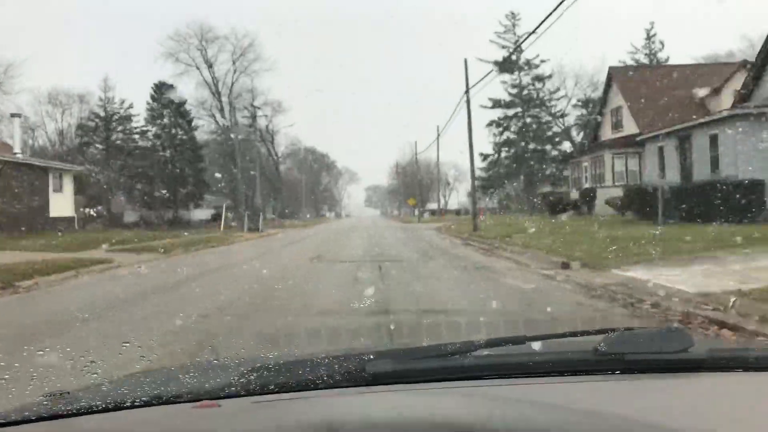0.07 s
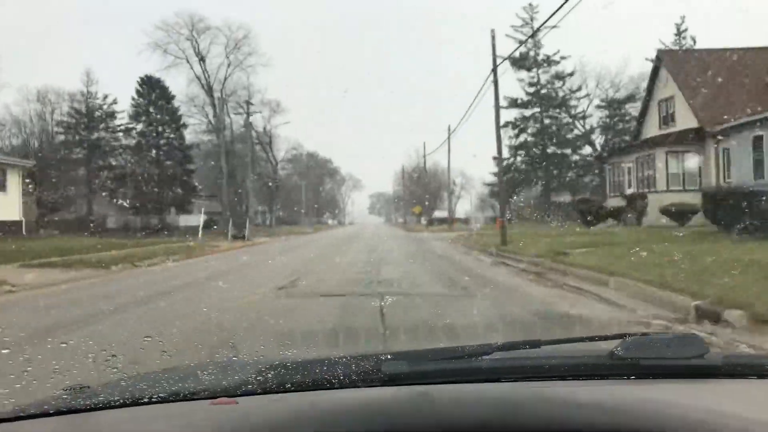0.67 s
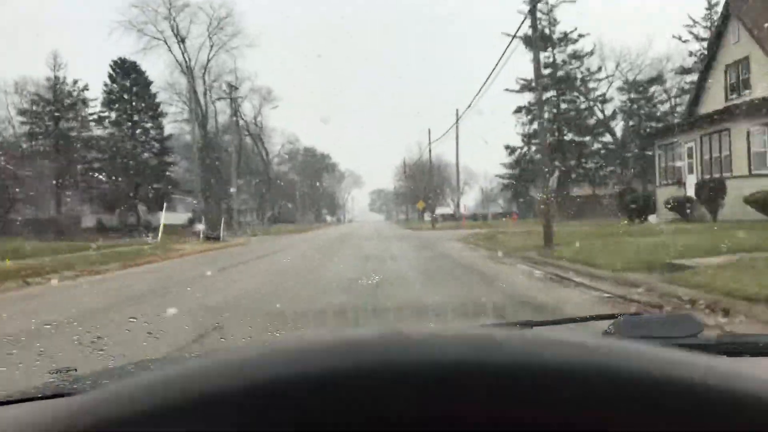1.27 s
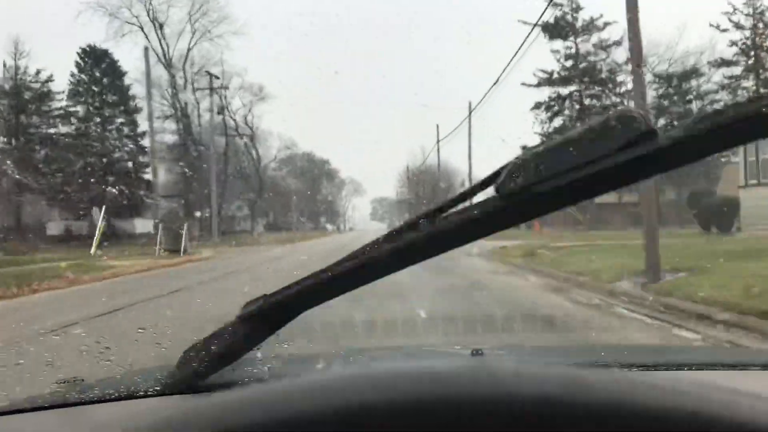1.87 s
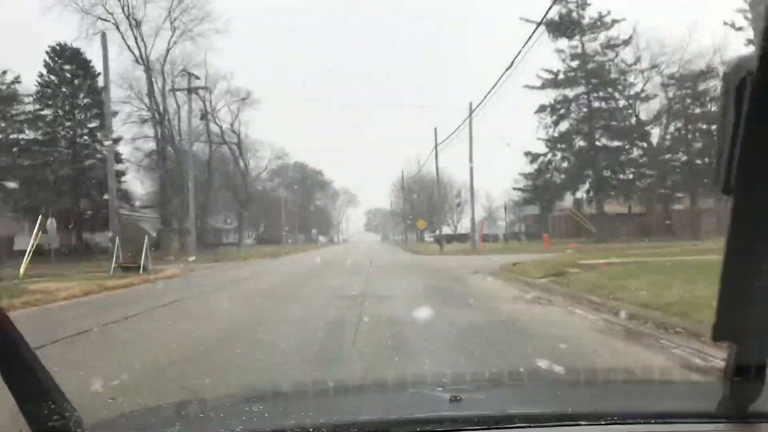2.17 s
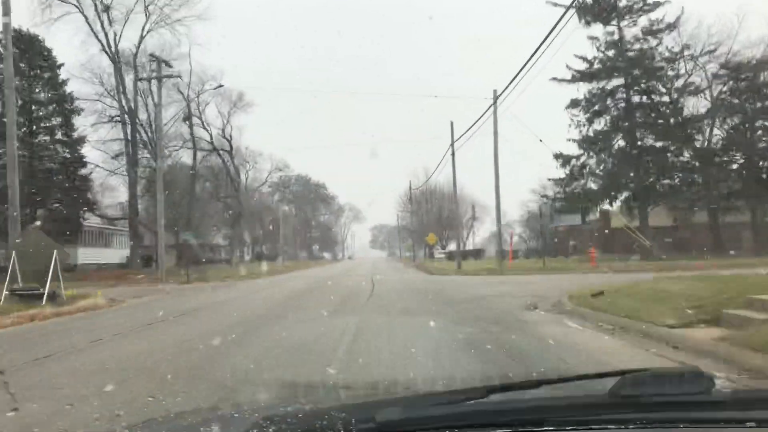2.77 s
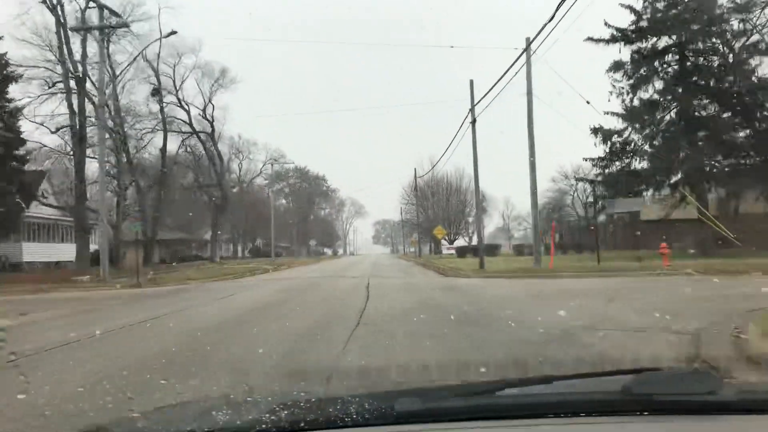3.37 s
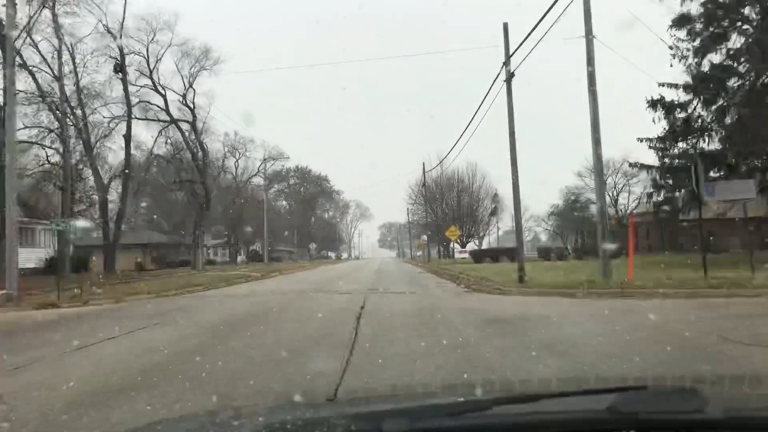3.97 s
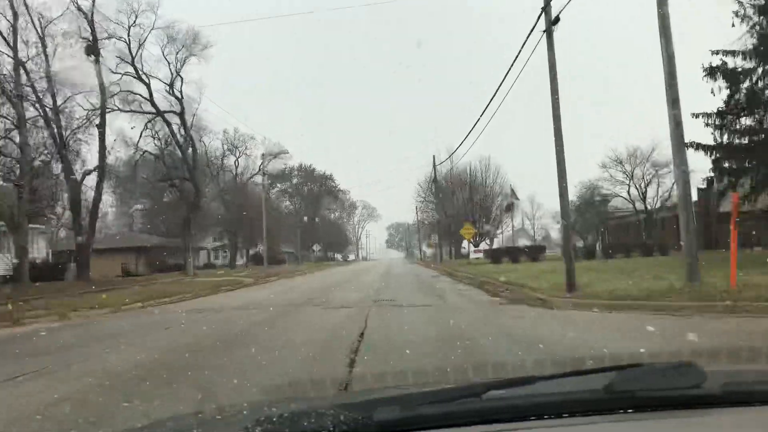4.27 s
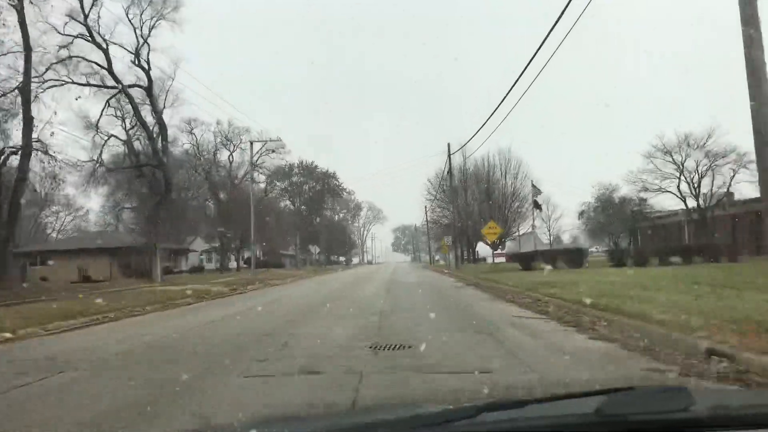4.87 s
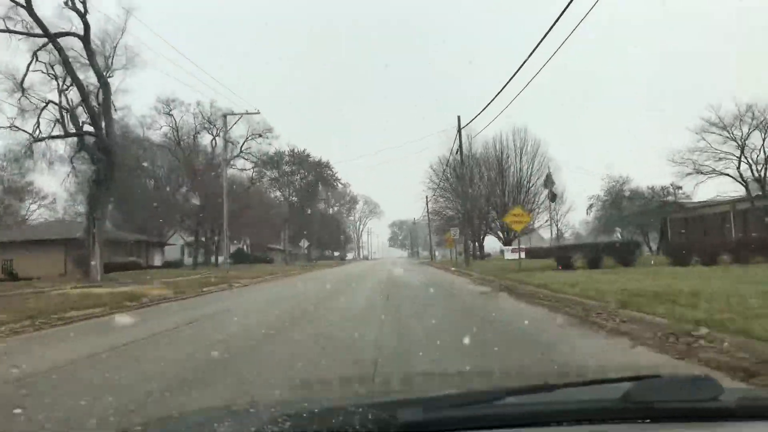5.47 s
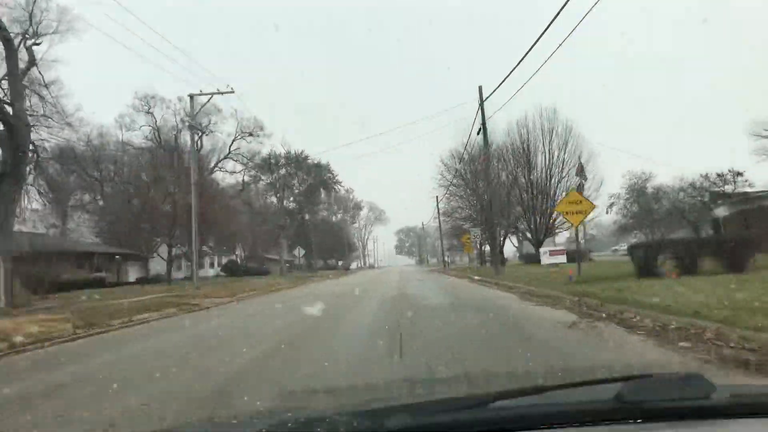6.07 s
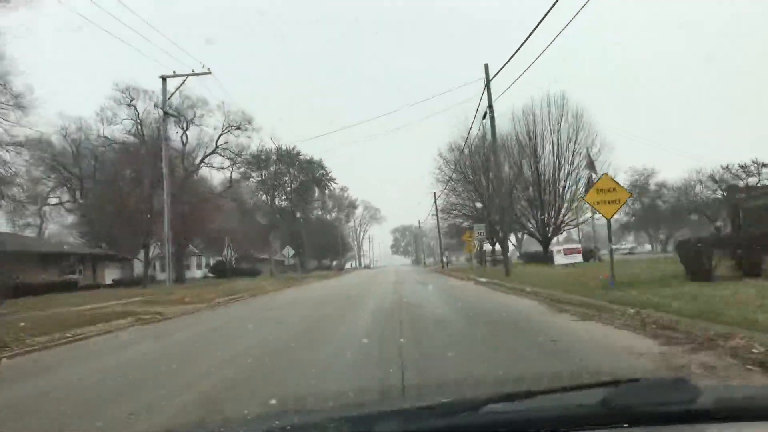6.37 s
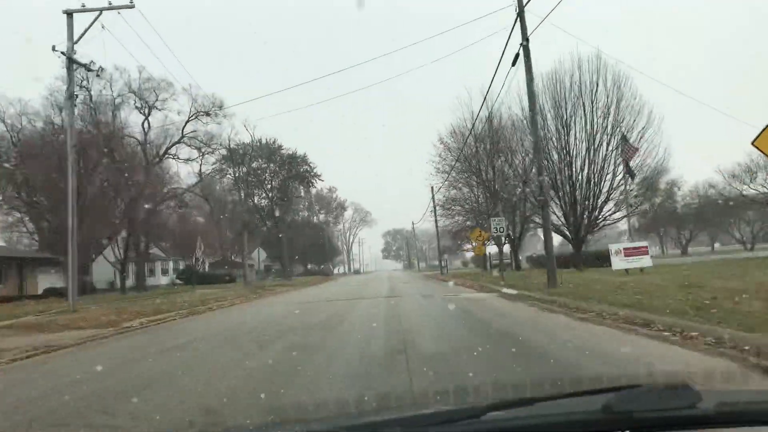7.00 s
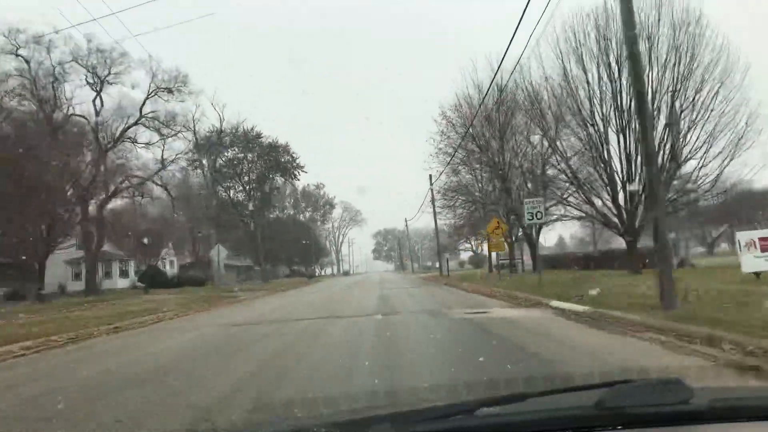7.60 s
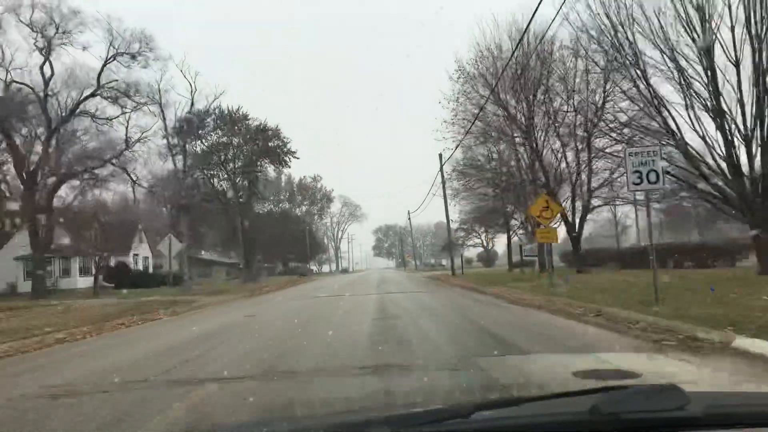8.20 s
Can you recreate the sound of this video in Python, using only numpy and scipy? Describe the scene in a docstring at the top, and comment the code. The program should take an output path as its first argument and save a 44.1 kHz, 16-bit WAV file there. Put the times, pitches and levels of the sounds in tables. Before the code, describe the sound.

Tyres boom and roar on worn asphalt for about eight seconds, heard from behind the steering wheel. A low engine hum, soft heater hiss, faint gear whine and lightly ticking trim run throughout. Near 0.8 seconds the car thumps over cracks, with a small plastic click. At about 1.6 seconds a stalk clicks sharply and the wipers make one sweep, the linkage knocking dully and the blades hissing briefly on wet glass, ending with knocks at 2.3 seconds. More road thumps overlap this, and the engine drops in pitch around 2 seconds as it shifts up. From 2.4 to 3.5 seconds the tread sings on a ribbed patch, with a tiny metallic tink near 2.9. The rumble swells with further thumps around 4.2, 5.4 to 5.9 and 7.2 to 7.4 seconds, the trim knocking near 5.5. The engine pitch rises slowly through the second half.

```python
"""Tyres on a worn, damp street, heard from inside the car: coarse asphalt booms and roars through the body,
cracks thump, and ribbed patches make the tread sing. The engine hums through the bulkhead and shifts up.
A stalk clicks and the wipers make one sweep, linkage knocking, blades hissing on wet glass.
Behind it all the heater blows, the trim ticks and the gears whine faintly with the road speed."""
import sys
import numpy as np
from scipy import signal
from scipy.fft import rfft, irfft, next_fast_len
from scipy.io import wavfile

SR = 44100
rng = np.random.default_rng(int(sys.argv[2]) if len(sys.argv) > 2 else 0)


def log_audio(samples):
    """Write samples as a 16-bit WAV file to the path given in sys.argv[1]."""
    # one column per channel
    frames = np.atleast_2d(samples).T
    # limit to full scale, then quantise
    limited = np.clip(frames, -1, 1)
    pcm = np.round(limited * 32767).astype(np.int16)
    wavfile.write(sys.argv[1], SR, pcm)


N = 363384
T = np.arange(N) / SR
HEAVE_DB, BOOM_DB, ROAR_DB = -44, -24, -35  # road noise on smooth asphalt

# The tone of struck plastic. Each row: frequency in Hz, level in dB.
PLASTIC_TONE = [(400, 3), (1400, 5.5), (2000, 2), (2400, 12.5), (2950, 1), (3550, 9), (4400, -0.5),
                (5200, 6.5), (5800, -1.5), (6300, 7.5), (6900, -1), (8300, 1.5), (9000, 1.5), (11000, -5),
                (13500, -1), (16000, -4.5)]


def tyres(heave_gain, boom_gain, roar_gain, rush_db=-46, rush_db_per_s=0.29):
    """Ruts heave the body, coarse asphalt shakes it into a boom and a roar; the tread sings and rushes."""
    # The tone of each layer. Each row: frequency in Hz, relative level in dB.
    heave_tone = [(24, -38), (31, -19), (38, -0.5), (48, -2.5), (61, -4), (80, -22.5)]  # the body on its suspension
    boom_tone = [(18, -44.5), (26, -29.5), (35, -6), (49, -1), (66, -3.5), (87, 5), (115, -2), (155, -7),
                 (190, -13), (260, -30.5)]
    roar_tone = [(130, -3.5), (195, -0.5), (280, 0), (322, -3.5), (355, -2), (420, -8), (500, -11.5),
                 (620, -13.5), (760, -21), (1100, -43)]
    sing_tone = [(220, -6), (262, -4), (287, 5.5), (320, -6), (356, 4), (378, -14), (398, 0), (450, -11.5),
                 (570, -15.5), (700, -24)]
    rush_tone = [(550, -28), (760, -3), (870, 4.5), (1050, 5), (1290, 0), (1440, 4.5), (1580, 2.5),
                 (1800, -5.5), (2300, -3), (2700, -21), (4500, -21)]
    # Ribbed patches that make the tyres sing. Each row: start, attack, hold, release in seconds,
    # level in dB.
    ribs = [(2.4, 0.11, 0.5, 0.56, -39.5), (2.78, 0.076, 0.04, 0.21, -38)]
    boom = colour(grit(per_s=1500, spread_db=0.5), boom_tone, tilt_db=0.84) * boom_gain
    roar = colour(noise(), roar_tone) * roar_gain
    sing = colour(noise(), sing_tone) * swells(ribs)
    creep_db = rush_db_per_s * (T - T.mean())
    rush = colour(noise(), rush_tone) * undb(rush_db + creep_db + 0.5 * drift(hz=22))
    heave = colour(noise(), heave_tone) * heave_gain
    return heave + boom + roar + sing + rush


def road_surface():
    """Gains of heave, boom and roar: each worn stretch adds its power to that of the smooth asphalt."""
    # Worn stretches. Each row: start and length in seconds, then heave, boom and roar in dB.
    stretches = [(0.77, 0.07, -22, -21, -48), (1.012, 0.016, -21, -17.5, -52),
                 (1.574, 0.52, -25.5, -21.5, -41), (2.144, 0.41, -27, -27.5, -58),
                 (3.15, 0.24, -27, -25, -38), (3.72, 0.035, -30, -43, -36.5), (4.122, 0.39, -26, -27, -47),
                 (4.725, 0.35, -33, -22.5, -40), (5.42, 0.3, -23, -21.5, -47),
                 (6.143, 0.33, -27.5, -35, -41.5), (7.145, 0.39, -26, -29, -54)]
    power = undb([HEAVE_DB, BOOM_DB, ROAR_DB])[:, None] ** 2
    for start, length, *levels_db in stretches:
        envelope = swell(start, attack_s=0.0039, hold_s=length, release_s=0.25)
        power = power + np.outer(undb(levels_db), envelope) ** 2
    return np.sqrt(power)


def crack_thumps(gain_db=-2.5):
    """A tyre folds over a crack: the cabin air swells for one cycle and is damped within two more."""
    # Cracks in the road. Each row: start in seconds, relative level in dB, pitch in Hz.
    cracks = [(0.733, -7, 120), (0.777, -4.5, 111), (0.847, -0.5, 117), (1.031, -6, 94), (1.222, -10, 100),
              (1.623, -1.5, 115), (1.719, 0.5, 127.5), (1.797, -4, 59.6), (1.959, -5, 81.4),
              (1.989, -4, 83.6), (3.410, -8, 121), (3.736, -13, 72), (3.913, -9, 97), (4.137, -1, 109),
              (4.204, -12, 105), (4.289, -4, 79.4), (4.91, -10.5, 100), (5.439, -2, 111),
              (5.505, -2.5, 121), (5.765, -3, 90), (5.865, -3, 80.5), (7.170, -7.5, 101), (7.241, -9, 109),
              (7.309, -10.5, 101), (7.426, -9.5, 101.4)]
    out, t = np.zeros(N), T[:SR // 8]
    for start, db, hz in cracks:
        cycles = hz * t
        envelope = (cycles * np.exp(1 - cycles)) ** 3
        add(out, start, -undb(db + gain_db) * envelope * np.sin(2 * np.pi * cycles))
    return out


def engine(wander=0.0028):
    """Only the lowest firing orders pass the bulkhead: a hum that wavers a little in pitch."""
    # Revs and load through the upshift. Each row: time in seconds, firing rate in Hz, level in dB.
    revs = [(0, 68.78, -23), (.8, 73.25, -30), (1.9, 75, -27.5), (2.3, 51.5, -42), (4.2, 48.06, -24),
            (5.1, 50.3, -31), (7.2, 56.75, -34.5), (7.8, 58.55, -28.5), (8.24, 59.6, -26.5)]
    orders_db = [1, -5, -44, -37.5, -24]
    firing_hz, level_db = curves(revs)
    phase = 2 * np.pi * np.cumsum(firing_hz * (1 + wander * drift(hz=4.2))) / SR
    hum = sum(undb(db) * np.sin(order * phase) for order, db in enumerate(orders_db, 1))
    return unit(hum) * undb(level_db)


def plastic_clicks():
    """The stalk and small plastic parts snap sharply and ring briefly."""
    # Each row: start in seconds, level in dB, ring time in seconds, brightness in dB per octave.
    clicks = [(.744, -54, .05, 7), (.8603, -42.5, .016, 2), (.8628, -40.5, .013, 3),
              (0.868, -42, .035, -10), (1.083, -45, 0.04, -5.5), (1.088, -47, .025, -4),
              (1.553, -44, 0.079, 0), (1.5614, -35.5, .035, -2), (1.5695, -30.5, .045, -2),
              (1.5743, -35, 0.049, -1.5), (1.5897, -35, .035, -5), (1.593, -35, 0.088, -5),
              (1.604, -45, .06, -3), (2.2815, -39, .014, -5), (2.3063, -36, .04, -7.5),
              (2.320, -40, 0.057, -8.5), (4.672, -58, .03, 5), (5.401, -40, .035, -5.5)]
    out = np.zeros(N)
    for start, db, t60, tilt_db in clicks:
        add(out, start, undb(db) * strike(PLASTIC_TONE, t60, tilt_db))
    return out


def dull_knocks(gain_db=4):
    """The wiper linkage and the trim knock with a soft attack and a low, damped ring."""
    # Each row: start in seconds, relative level in dB, ring time in seconds, brightness in dB per octave.
    knocks = [(.859, -34, .07, 4), (1.620, -35, .12, -.5), (1.720, -33, .08, -.5), (1.848, -33.5, .06, 3),
              (1.865, -36.5, .05, 2.5), (1.877, -36, .05, 3), (1.985, -38, .05, 2), (2.032, -43, .06, 2.5),
              (2.305, -35.5, .08, .5), (2.317, -30, .08, -2.5), (2.338, -33.5, .08, .5),
              (5.440, -39, .08, 1.5), (5.566, -34, .04, 2), (5.574, -33, .07, 2)]
    # The tone of the knocked parts. Each row: frequency in Hz, level in dB.
    knock_tone = [(150, -3), (350, 26.5), (540, 16), (750, 4), (1200, 12), (2000, 0), (3500, -9),
                  (7000, -34), (16000, -48)]
    out = np.zeros(N)
    for start, db, t60, tilt_db in knocks:
        add(out, start, undb(db + gain_db) * strike(knock_tone, t60, tilt_db, attack_s=0.002))
    return out


def metal_tinks():
    """A small metal part is tapped: a click of contact and a few high, short modes."""
    # Each row: start in seconds, level in dB, relative contact level in dB, brightness in dB per octave.
    taps = [(1.329, -45, -6, -6), (2.878, -38.5, -10, 1)]
    # The part's modes. Each row: frequency in Hz, relative level in dB, ring time in seconds.
    metal_modes = [(4800, -8, 0.033), (5130, -9, .025), (5650, -17, .02), (9000, -13, .03),
                   (9080, -9, .035), (9630, -11, .03), (13300, -22, .02)]
    out, t = np.zeros(N), T[:SR // 3]
    hz, modes_db, t60 = np.transpose(metal_modes)
    modes = np.sin(2 * np.pi * np.outer(hz, t)) * np.exp(-np.log(1000) * np.outer(1 / t60, t))
    for start, db, contact_db, tilt_db in taps:
        ring = undb(modes_db + tilt_db * np.log2(hz / hz.mean())) @ modes
        contact = undb(contact_db) * strike(PLASTIC_TONE, t60=0.038, tilt_db=-2)
        add(out, start, undb(db) * (ring + contact))
    return out


def sliding_hiss():
    """Sliding contact, such as blades on wet glass, catches and slips in tiny grains: a fine hiss."""
    # Light slides. Each row: start, attack, hold, release in seconds, level in dB.
    slides = [(.856, .012, 0.042, 0.074, -54.5), (1.02, 0.067, .27, .1, -68),
              (1.86, 0.12, .004, 0.051, -52)]
    # The tone of the friction. Each row: frequency in Hz, level in dB.
    hiss_tone = [(1500, 12), (4000, -4), (7000, -3), (10000, -2), (14000, -1), (16000, 0)]
    return colour(grit(per_s=2400, spread_db=2), hiss_tone) * swells(slides)


def heater(air_db=-49, flutter_db=0.57, waver_db=2):
    """Air hisses evenly from the windscreen vents, with faint, wavering tones of the fan."""
    # The tone of the vent air, then the fan's partials. Each row: frequency in Hz, level in dB.
    air_tone = [(300, 10.5), (1500, 7), (3000, 1.5), (3800, -1), (4500, -4.5), (4950, -5.5), (5900, -5.5),
                (7100, -10.5), (7600, -13.5), (9200, -12), (10500, -17), (11500, -16), (13000, -20.5),
                (16000, -20)]
    fan_partials = [(920, -68.5), (1383, -67.5), (1728, -63)]
    out = colour(noise(), air_tone) * undb(air_db + flutter_db * drift(hz=18))
    for hz, db in fan_partials:
        gain = undb(db - waver_db * drift(hz=6))
        out += gain * np.sin(2 * np.pi * hz * T + drift(hz=2.6))
    return out


def gear_whine(hz_per_m_s=101.7, db=-60, db_per_m_s=2, wander=0.0018, flutter_db=3):
    """Meshing gears give a thin, fluttering tone whose pitch and level follow the road speed."""
    # The car's pace. Each row: time in seconds, speed in metres per second.
    road_speed = [(0, 13.5), (1.8, 14.05), (2.3, 13.1), (4.3, 13.0), (6.2, 13.92), (8.24, 14.35)]
    speed, = curves(road_speed)
    mesh_hz = hz_per_m_s * speed * (1 + wander * drift(hz=16))
    tone = np.sin(2 * np.pi * np.cumsum(mesh_hz) / SR) * undb(flutter_db * drift(hz=7.5))
    return unit(tone) * undb(db + db_per_m_s * (speed - speed.mean()))


def trim_rattle(boom_gain, smooth_road_db=-63.5):
    """Loose trim ticks dully, harder the more the body shakes."""
    hits = grit(per_s=120, spread_db=-4.5)
    tick = strike(PLASTIC_TONE, t60=0.02, tilt_db=-9.5)
    ticks = signal.fftconvolve(hits, tick)[:N]
    return unit(ticks) * boom_gain * undb(smooth_road_db - BOOM_DB)


def cabin_reflections(x):
    """Reflections from glass and dash leave narrow, steady peaks and dips in the tone."""
    # Each row: centre in Hz, width in Hz, boost or cut in dB.
    ripples = [(1570, 60, -4.5), (1637, 72, 0.5), (1904, 120, 2.5), (2106, 160, -2.5), (2974, 100, 3.5),
               (3900, 75, 1.5), (4630, 220, 2), (4930, 200, -3), (6700, 140, 1), (7200, 250, 3),
               (7700, 220, -2.5), (10370, 300, -3.5)]
    f = np.fft.rfftfreq(N, 1 / SR)
    ripple_db = sum(db * np.exp(-(2 * (f - hz) / width) ** 2) for hz, width, db in ripples)
    return irfft(rfft(x) * undb(ripple_db), N)


def strike(tone, t60, tilt_db=0, attack_s=0.00014, snap_db=-7, snap_s=0.0012):
    """A blow on a damped part: a snap of contact, then dense modes that die together."""
    t = T[:SR // 3]
    envelope = np.exp(-np.log(1000) * t / t60) + undb(snap_db) * np.exp(-t / snap_s)
    onset = 1 - np.exp(-t / attack_s)
    return colour(rng.standard_normal(len(t)), tone, tilt_db) * envelope * onset


def grit(per_s, spread_db):
    """Tiny impacts of uneven size at random moments, like stones meeting the tread."""
    return (rng.random(N) < per_s / SR) * noise() * undb(spread_db * noise())


def noise():
    """White noise."""
    return rng.standard_normal(N)


def drift(hz):
    """Smooth random motion of rms 1, changing about hz times a second."""
    return colour(noise(), [(1, 0), (hz, 0)])


def colour(x, tone, tilt_db=0):
    """Filter by a (Hz, dB) outline with steep skirts, tilted in dB per octave; rms 1."""
    hz, db = np.transpose(tone)
    size = next_fast_len(len(x))
    octave = np.log2(np.maximum(np.fft.rfftfreq(size, 1 / SR), 1))
    octaves_outside = np.abs(octave - np.clip(octave, np.log2(hz[0]), np.log2(hz[-1])))
    gain_db = np.interp(octave, np.log2(hz), db) + tilt_db * octave - 24 * octaves_outside
    return unit(irfft(rfft(x, size) * undb(gain_db), size)[:len(x)])


def swell(start, attack_s, hold_s, release_s):
    """An envelope that rises smoothly, holds and falls."""
    rise = np.clip((T - start) / attack_s, 0, 1)
    fall = np.clip(1 - (T - start - attack_s - hold_s) / release_s, 0, 1)
    return np.sin(np.pi / 2 * rise * fall) ** 2


def swells(table):
    """The summed envelope of (start, attack, hold, release, dB) rows."""
    return sum(undb(db) * swell(*shape) for *shape, db in table)


def curves(table):
    """The columns of a timed table, one value a sample."""
    times, *columns = np.transpose(table)
    return [np.interp(T, times, column) for column in columns]


def add(out, start_s, sound):
    """Mix a sound in at its start time."""
    i = int(start_s * SR)
    out[i:i + len(sound)] += sound[:N - i]


def undb(db):
    """Decibels to gain."""
    return 10 ** (np.asarray(db) / 20)


def unit(x):
    """Scale to rms 1."""
    return x / np.sqrt(np.mean(x ** 2))


def scene():
    """Everything as heard behind the steering wheel, in mono."""
    heave_gain, boom_gain, roar_gain = road_surface()
    rolling = tyres(heave_gain, boom_gain, roar_gain) + crack_thumps() + trim_rattle(boom_gain)
    machinery = engine() + gear_whine() + heater()
    fittings = plastic_clicks() + dull_knocks() + metal_tinks() + sliding_hiss()
    return cabin_reflections(rolling + machinery + fittings)[None]


def record(dry, top_hz=15600, fade_s=0.006):
    """Round off the peaks near full scale, fade the very end and cut the highest treble."""
    limited = dry / (1 + dry ** 8) ** (1 / 8)
    fade_out = np.minimum((T[-1] - T) / fade_s, 1)
    lowpass = signal.ellip(10, 0.2, 80, top_hz, fs=SR, output="sos")
    return signal.sosfilt(lowpass, limited * fade_out)


dry = scene()
out = record(dry)
log_audio(out)
```